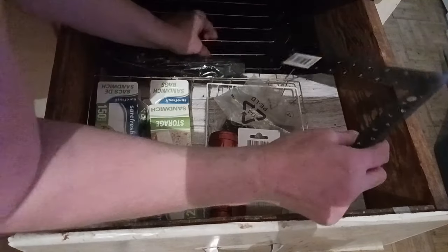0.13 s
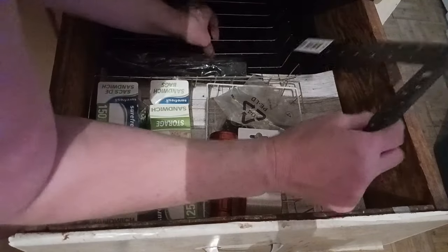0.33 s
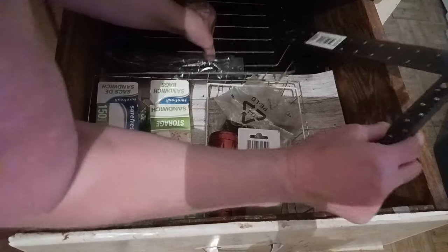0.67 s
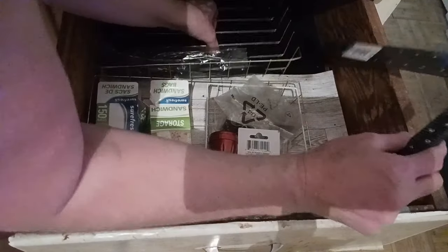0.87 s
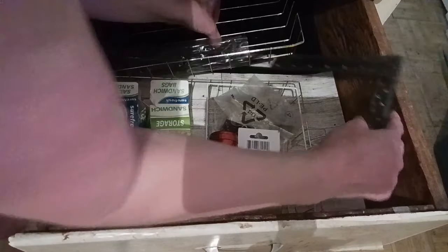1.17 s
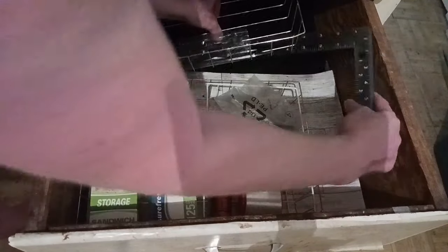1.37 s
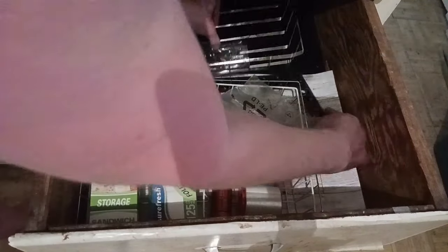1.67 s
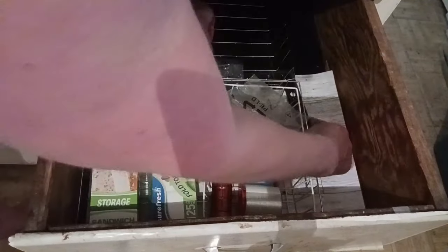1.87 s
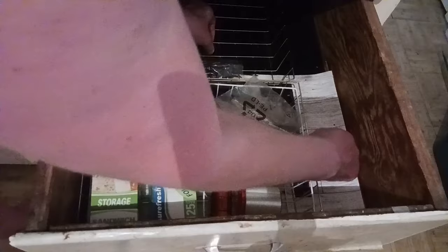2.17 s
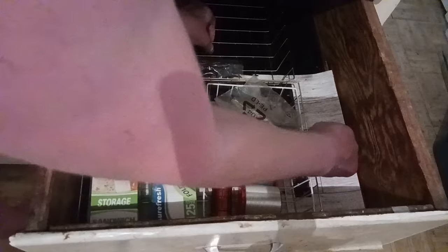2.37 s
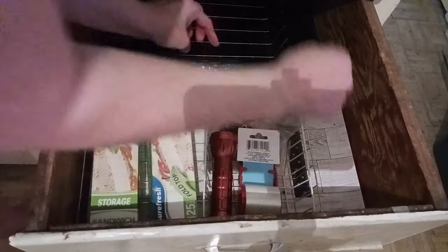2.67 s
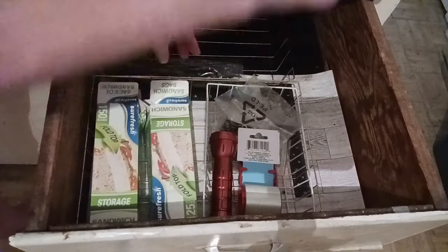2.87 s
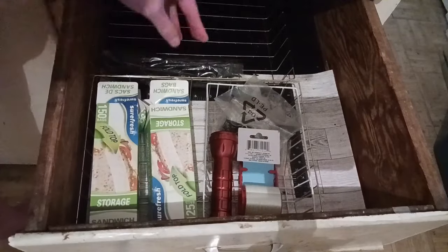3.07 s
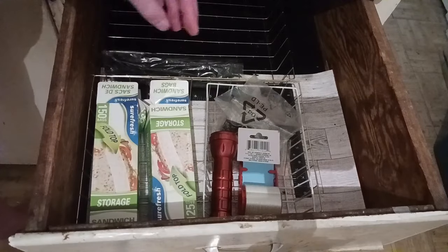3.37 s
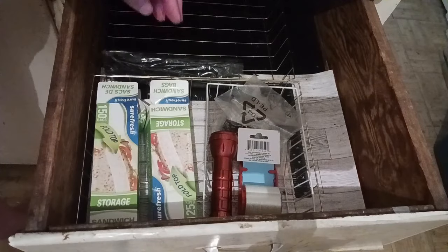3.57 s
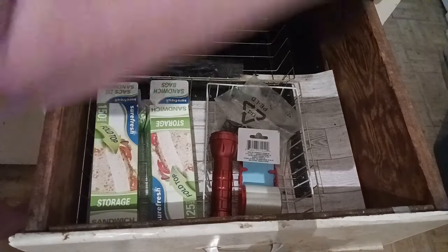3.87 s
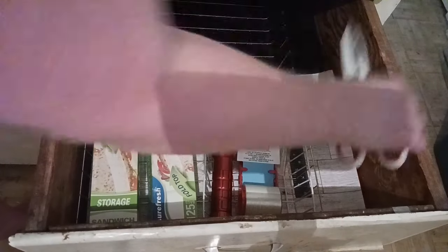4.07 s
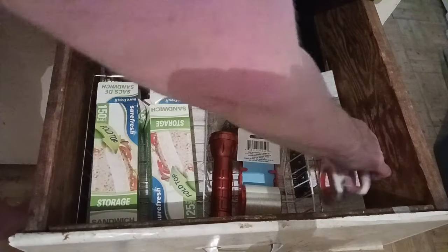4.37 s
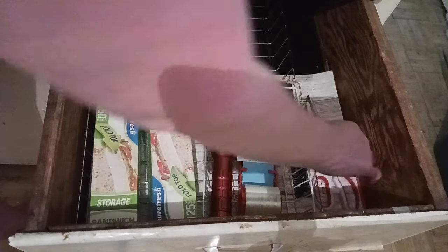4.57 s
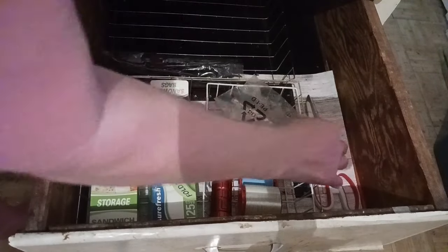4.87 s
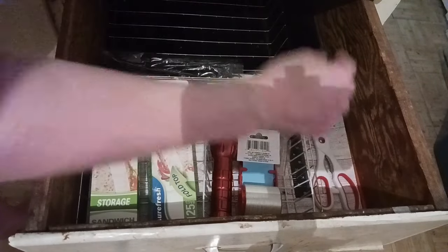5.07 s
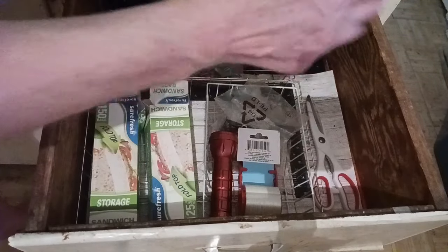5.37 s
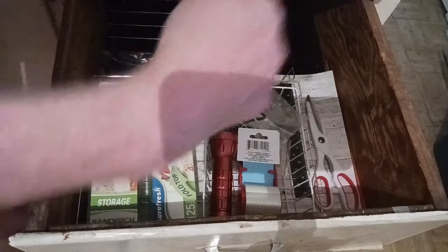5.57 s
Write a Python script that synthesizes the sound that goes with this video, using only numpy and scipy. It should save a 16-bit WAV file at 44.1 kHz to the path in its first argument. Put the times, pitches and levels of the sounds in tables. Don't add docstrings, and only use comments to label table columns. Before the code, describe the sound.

Close above an open wooden drawer in a quiet kitchen, a steel square scrapes and ticks on wire baskets, landing with rattles and hollow wooden knocks, loudest about a second and a half in. A near-silent gap with faint fridge hum follows, then a light plastic rustle, scissors clacking down onto paper, and dry crinkling to the end. Stereo microphone, very near, short boxy echoes.

```python
import sys
import numpy as np
from scipy import signal
from scipy.fft import rfft, irfft, next_fast_len
from scipy.io import wavfile

SR = 44100
rng = np.random.default_rng(int(sys.argv[2]) if len(sys.argv) > 2 else 0)


def dump(signal):
    limited = np.clip(np.atleast_2d(signal).T, -1, 1)
    pcm = np.round(limited * 32767).astype(np.int16)
    wavfile.write(sys.argv[1], SR, pcm)


def to_linear_factor(level_db):
    exponent = np.asarray(level_db, float) / 20
    return 10 ** exponent


N = 252252
SPAN = 1 << 14

# pitch_hz, level_db (per Hz)
AIR = [(15, -60), (25, -34), (41, -12), (64, -8), (91, -26), (108, -17), (169, -7), (220, -9), (242, -23),
       (282, -9.5), (324, -14), (455, -11), (680, -24.5), (1000, -30.5), (1300, -59), (2200, -120)]
# pitch_hz, likeness (-1 to 1)
AIR_ALIKE = [(60, 0.71), (180, 0.7), (550, 0.27), (1650, -0.22), (4970, 0.63), (15000, -0.21)]
# pitch_hz, level_db (per Hz)
HISS = [(530, -39), (900, -16), (978, -7.5), (1210, -13), (1450, -8.5), (1780, -13.5), (3000, -19.5),
        (5520, -27), (7530, -16), (8690, -21.5), (15600, -12.5)]
# pitch_hz, width_hz, level_db
FRIDGE = [
    (61, 5.1, -74.5),
    (2100, 15, -94),
    (7560, 330, -95.5),
]
# pitch_hz, t60_s
KITCHEN_T60 = [(100, 0.3), (500, 0.28), (2000, 0.31), (6000, 0.3), (14000, 0.25)]
# pitch_hz, likeness (-1 to 1)
ECHO_ALIKE = [(100, 0.8), (400, 0.8), (800, 0.22), (1500, 0.044), (14000, 0.039)]
# pitch_hz, level_db
ECHO_COLOUR = [(60, -4.5), (300, -2), (800, 3), (2000, 3), (12000, 4.5)]
# pitch_hz, left_minus_right_db
PORT_LEAN = [(60, -2.5), (180, -2.5), (550, -4.5), (1650, -0.5), (4970, -1.5), (15000, 3)]
# time_s, left_minus_right_db
PLACE = [(0.0, 2.5), (1.15, 2), (1.42, 1), (1.75, 2), (3.09, 7), (3.47, 3), (3.9, 3), (5.23, 4),
         (5.72, 16.5)]

# pitch_hz, width_hz, level_db
CARCASS = [(59.6, 4.6, -1), (122, 59, -7.5)]
# pitch_hz, width_hz, level_db
BOARDS = [(59, 9, -9.5), (114, 22, -9), (159, 35, -7.5), (270, 127.4, 1), (329, 52, -3), (367.4, 17, -5),
          (434.2, 55, 0.5), (474, 99, -4.5), (541.6, 34, -4.5)]
# pitch_hz, width_hz, level_db
KNOCK = [(744, 84, 2), (822, 88, 2.5), (869, 75, 1.5), (1100, 24, -3.5), (1190, 120, -5), (1530, 700, -4),
         (1695, 37, -13.5), (1860, 170, -15), (2360, 730, -3.5)]
# pitch_hz, level_db (per Hz)
BUZZ = [(530, -15), (950, -7.5), (1170, -5.5), (1630, -6.5), (3000, -7.5), (4000, -4.5), (5800, -11.5),
        (8590, -15.5), (10500, -13.5), (13200, -13.5), (15600, -21.5)]
# pitch_hz, level_db (per Hz)
RASP = [(290, -24), (500, -12), (1030, -17), (1400, -6), (1900, -9), (3250, -11), (3810, -10), (8050, -1),
        (12200, 7), (15600, 2)]
# pitch_hz, level_db (per Hz)
LINER = [(350, -1.5), (700, -3.5), (1300, 3), (2300, -3), (4400, -32), (9000, -30.5), (15600, -21)]

# start_s, level_db
SHAKES = [(0.0, -46), (0.22, -33.5), (0.52, -42), (0.64, -45), (1.04, -32.5), (1.17, -26), (1.573, -32.5),
          (1.683, -45.5), (1.865, -36.5), (2.15, -40), (3.459, -49), (4.29, -46), (4.419, -26.5),
          (4.47, -35), (4.533, -31.5), (4.6, -58.5)]
# start_s, length_s, pitch_hz, rise_hz, level_db
SQUEAK = (3.875, .11, 12900, 1600, -70)
# start_s, peak_db, body_db, left_minus_right_db
SNAPS = [(2.94, -60.5, -17.5, 9), (3.25, -54, -28, 10.5), (3.326, -58, -9, 5), (3.34, -59, -2, 4),
         (3.583, -27, -20, -0.5), (4.823, -48.5, 4, 2.5), (4.965, -53, 4, 4), (5.561, -56.5, 7.5, 5),
         (4.9037, -43, -7, 3), (4.93, -53, 4, -1), (5.146, -43, -6, 3), (5.01, -32.5, 1, 3),
         (5.0575, -31, -4.5, 2), (5.083, -35, 1, -1), (5.1812, -40.5, 2.5, 4.5), (5.299, -65, 2, 6),
         (5.3608, -64, 14, 7), (5.383, -57.5, 8, 10), (5.4558, -59, 3, 8), (5.4838, -42.5, 3.5, 5.5),
         (5.503, -61, 7, 1), (5.5524, -58.5, -1, 9.5), (5.597, -45, 2, 4.5), (5.6679, -47, -21, 5),
         (5.6827, -49.5, -14.5, 9.5)]
# start_s, length_s, rattle_db, boards_db
DRAGS = [(0.0, 0.11, -54.5, -42), (0.2, 0.19, -46.5, -35), (0.55, 0.26, -46, -38.5), (1.06, 0.34, -48, -30),
         (1.41, 0.2, -49, -33), (1.58, 0.082, -44, -45), (1.87, 0.15, -43.5, -65.5),
         (2.1, 0.186, -59.5, -45), (4.285, 0.16, -54, -38), (4.43, 0.11, -51, -32.5),
         (4.55, 0.1, -62, -53.5)]
# start_s, length_s, rasp_db, boards_db
RUSTLES = [(3.44, 0.31, -61, -59), (3.553, 0.11, -42.5, -61), (4.83, 0.44, -60.5, -61),
           (4.986, 0.16, -47, -61), (5.14, 0.23, -65.5, -70.5), (5.4, 0.34, -72, -69)]
# start_s, length_s, scrape_db, boards_db
SCRAPES = [(1.0, 0.057, -49, -43), (1.44, 0.15, -41, -38.5), (3.31, 0.13, -52.5, -54), (3.4, 0.1, -53, -48),
           (4.3, 0.11, -36.5, -55), (3.9, 0.18, -75.5, -62.5), (4.815, 0.084, -45.5, -57),
           (5.0, 0.16, -47, -85), (5.46, 0.15, -67.5, -76)]
# start_s, pitch_hz, level_db, t60_s
RINGS = [(.112, 3500, -26, 0.06), (0.205, 3200, -30, 0.15), (0.2, 4600, -32, 0.15), (.522, 3900, -33, 0.08),
         (.55, 3600, -44, .2), (.0, 3630, -56, .6), (.125, 4200, -34, .15), (0.6255, 915, -27, 0.3),
         (.63, 3634, -40, 0.3), (.63, 1530, -39, .15), (.66, 1400, -43, .2), (.72, 4215, -45, .3),
         (.745, 4570, -46, .15), (.43, 5300, -48, .5), (.712, 861, -42, 0.15), (.752, 915, -41, 0.22),
         (1.179, 3800, -27, 0.08), (1.19, 4450, -33, .1), (1.108, 3650, -39, .5), (1.04, 4300, -36, .25),
         (0.891, 910, -36, 0.2), (0.893, 2050, -41, 0.25), (.892, 3640, -46, 0.4), (.62, 1125, -46, .3),
         (1.034, 4030, -25, 0.023), (1.107, 4550, -46, 0.48), (1.428, 2350, -37, .12),
         (1.424, 2090, -40, .1), (1.461, 2350, -37, .07), (1.575, 2500, -35.5, 0.17),
         (1.684, 1800, -24.5, 0.044), (1.684, 900, -24, 0.04), (1.75, 5110, -38, 0.21),
         (4.324, 770, -24.5, 0.025), (4.421, 1470, -14.5, 0.021), (4.537, 2390, -17, 0.03),
         (4.585, 2300, -37, 0.15), (4.55, 2600, -35, .15), (4.33, 1400, -41.5, 0.16),
         (4.47, 1500, -45, 0.18), (.76, 1720, -56, .5)]
# start_s, pitch_hz, level_db, t60_s
RAPS = [(.6245, 870, -22.5, 0.035), (.655, 311, -32.5, 0.13), (.634, 700, -35.5, 0.057),
        (0.626, 1440, -45, 0.062), (0.89, 1930, -30.5, 0.027), (1.572, 1100, -20, 0.023),
        (1.5785, 525, -18, 0.062), (1.6842, 1500, 0, .004), (1.6846, 518, -12.5, 0.035),
        (1.686, 389, -18, 0.15), (1.722, 510, -19.5, 0.095), (1.888, 532, -25, 0.076),
        (3.339, 1260, -45, 0.027), (1.168, 294, -26.5, 0.072), (1.167, 1970, -29, 0.027),
        (1.217, 270, -23, .08), (1.272, 265, -29, .1), (1.325, 330, -32, .15), (1.461, 400, -25, 0.07),
        (1.461, 1100, -37, .06), (1.492, 410, -25, 0.07), (1.534, 380, -25, .07), (4.824, 1450, -49, .08),
        (5.455, 1300, -56, .03), (5.485, 1350, -52, .03), (5.504, 1300, -53, .03), (5.552, 1300, -59, .03),
        (5.384, 1300, -56, .02), (1.13, 1500, -34, .02), (1.575, 3050, -24.5, 0.033),
        (1.535, 696, -29.5, 0.035), (1.534, 1100, -33, 0.025), (4.325, 260, -22.5, 0.12),
        (.892, 403, -32.5, 0.18), (1.686, 1172, -15, 0.064), (1.728, 1190, -17.5, .02),
        (1.8623, 2460, -17.5, 0.0011), (2.155, 277.3, -30, 0.17), (2.135, 270, -40, 0.34),
        (4.324, 511, -21, 0.07), (4.323, 1506, -26.5, 0.041), (4.396, 530, -25.5, 0.027),
        (4.396, 790, -36.5, 0.037), (4.419, 2106, -16, 0.027), (4.535, 1245, -20.5, 0.019),
        (4.54, 3160, -24.5, 0.028), (4.54, 279, -20.5, 0.06)]

# start_s, peak_db, boards_over_peak_db, brightness_db
BRUSHES = [(0.032, -36.5, -13, 2), (0.1118, -13.5, -16, 2), (0.2927, -28, -8.5, -4), (0.3915, -20, -17, 8),
           (0.877, -40, -21, 6), (0.8901, -27.5, -2, -19), (1.141, -29.5, -3, -3), (1.19, -22, -7, -3.5),
           (1.8665, -13, -15, 1), (1.1782, -13.5, -11, -2.5), (1.424, -35.5, -9, -5),
           (2.0726, -41.5, -5.5, -8), (3.4146, -49, -29, -7), (3.5538, -36, -24, -0.5),
           (4.5262, -22.5, -16, -5), (4.897, -42, -20, -13.5), (4.9856, -40, -35, -5)]
RATTLES = [(0.1864, -14.5, -12.5, 1), (0.2053, -20, -11.5, 0.5), (0.5207, -21, -13.5, -1),
           (0.7195, -40.5, 0, -6), (1.036, -20.5, -3, -3), (1.1052, -27.5, -19, -5.5),
           (1.1672, -18, -4.5, -0.5), (1.7265, -21.5, 3, -8.5), (4.2898, -31, 4, -3)]
BLOWS = [(0.4183, -26.5, -3.5, -5), (0.5791, -37, 4, -15), (1.2708, -26, -4, -6.5),
         (1.4324, -26.5, -15.5, 0.5), (1.4603, -36.5, -3.5, -14.5), (1.573, -16.5, -3, -8.5),
         (1.5785, -6, -9.5, -6.5), (1.6842, -6, -10, -11), (1.8636, -14.5, -10, -8),
         (1.889, -27, -1.5, 0.5), (2.1544, -23, -4, -7.5)]
TAPS = [(0.631, -29.5, -32, -2), (1.2335, -32.5, -13, 0.5), (1.6174, -34, -22, -24), (3.322, -66, 4, -1),
        (4.469, -38.5, -7, -8)]
THUDS = [(0.1318, -26.5, 6.3, -36), (0.6225, -48.5, 18.7, -20), (1.4948, -39, 8.1, -38.5),
         (1.535, -41.5, 6, -13), (2.1266, -69, 23, 5), (3.3393, -50.5, 5.1, -15), (4.3232, -33, 9.7, -6.5),
         (4.3996, -45, 7.7, -9), (4.5415, -37.5, 14.9, -34)]
SCISSORS = [(4.3232, -28.5, 2, -18.5), (4.419, -9, -2.5, 1.5), (4.5355, -14.5, -10, -16),
            (4.5405, -18.5, -5.5, -24)]
TICKS = [(0.0, -43, -6.5, -5.5), (.7, -32.5, -16, -3), (1.13, -29, -6.5, -4), (1.416, -49, -14, -12.5),
         (2.163, -30, -14, -3), (4.429, -22.5, -21.5, -15), (.5627, -28, -8, 14), (.798, -43.5, -20, -2),
         (.878, -53, -20, 1)]
# rows, knock_over_peak_db, chatter_t60_s, first_crack_over_chatter (ratio),
# drawer_echo_db, kitchen_echo_db, top_octave_db
CONTACTS = [(BRUSHES, -27.5, 0.038, 1.6, 4.2, 6.7, 0.45), (RATTLES, -15, 0.055, 1.1, 3.1, 4, 0.5),
            (BLOWS, -7, 0.046, 4, 0.74, 3, 0.5), (TAPS, -1, .08, 2, 15, 4, 0.5),
            (THUDS, -0.5, 0.087, 1.3, 3, 3.7, -1), (SCISSORS, -7, 0.017, 7.3, 2.4, 0.69, -8.5),
            (TICKS, -11.5, 0.05, 1.6, 4.7, 2.2, 0.5)]


def unit(x):
    return x / np.sqrt(np.mean(x ** 2) + 1e-20)


def peak(x):
    return x / (np.abs(x).max() + 1e-12)


def along(points, hz):
    f, v = np.transpose(points)
    return np.interp(np.log(hz + 1), np.log(f + 1), v)


def hand_place():
    s, pan_db = np.transpose(PLACE)
    return np.interp(np.arange(N) / SR, s, pan_db)


def filtered(x, response):
    m = next_fast_len(x.shape[-1] + 4096)
    spectrum = rfft(x, m) * response(np.fft.rfftfreq(m, 1 / SR))
    return irfft(spectrum, m)[..., :x.shape[-1]]


def tilted(spectrum, bright_db):
    def response(hz):
        above_4k = np.clip(np.log2(hz / 4000 + 1e-3), 0, 1)
        above_8k = np.clip(np.log2(hz / 8000 + 1e-3), 0, 1)
        return to_linear_factor(along(spectrum, hz) + bright_db * above_4k + 0.37 * bright_db * above_8k)
    return response


def modes(table, scatter_db):
    hz, width, db = np.transpose(table)[..., None]
    signs = (-1) ** np.arange(len(table))
    gains = to_linear_factor(db[:, 0] + scatter_db * rng.standard_normal(len(table))) * signs
    return lambda f: gains @ (1 / (1 - 1j * (hz * hz / (f + 1e-6) - f) / width))


def mesh(share):
    wire_hz = 1100 * (7000 / 1100) ** rng.random(40)
    thicket = modes([(hz, 22 + .008 * hz, 0) for hz in wire_hz], scatter_db=2)
    grid = np.geomspace(100, SR / 2, 2500)
    return lambda f: 1 + share * np.interp(f, grid, thicket(grid))


def grainy(size, spread_db, grain):
    luck = np.minimum(rng.exponential(size=size // grain + 1), 3)
    strength = np.repeat(to_linear_factor(spread_db * luck), grain)[:size]
    return unit(strength * rng.standard_normal(size))


def stroke(length_s):
    attack_s, release_s, fade_db = 0.046, 0.056, 10
    t = np.arange(round(length_s * SR)) / SR
    rise = np.minimum(t / attack_s, 1)
    fall = np.minimum((length_s - t) / release_s, 1)
    return rise * to_linear_factor(-fade_db * t / length_s) * fall


def paired(x, alike):
    def turn(hz):
        return np.arccos(np.clip(along(alike, hz), -1, 1)) / 2
    mid, side = filtered(x, lambda hz: np.array([np.cos(turn(hz)), np.sin(turn(hz))]))
    return np.array([mid + side, mid - side])


def add(track, sound, s):
    part = track[:, round(s * SR):][:, :sound.shape[1]]
    part += sound[:, :part.shape[1]]


def kitchen():
    def noise(response):
        return unit(filtered(rng.standard_normal((2, N)), response))
    air = to_linear_factor(-66) * noise(lambda hz: to_linear_factor(along(AIR, hz)))
    hiss = to_linear_factor(-73) * noise(lambda hz: to_linear_factor(along(HISS, hz)))
    hum = sum(to_linear_factor(db) * noise(lambda f: np.exp(-((f - hz) / width) ** 2)) for hz, width, db in FRIDGE)
    motor = to_linear_factor(-68.5) * np.sin(2 * np.pi * 59.5 * np.arange(N) / SR)
    return paired(air + hiss + hum, AIR_ALIKE) + motor


def echoes(count):
    t = np.arange(SPAN) / SR
    hz, ts, z = signal.stft(rng.standard_normal((count, 2, SPAN)), SR, nperseg=256)
    decay = to_linear_factor(-60 * ts / along(KITCHEN_T60, hz)[:, None])
    tail = signal.istft(z * decay, SR, nperseg=256)[1][..., :SPAN]
    tail = tail * (1 - to_linear_factor(-60 * t / 0.023))
    box = rng.standard_normal((count, 2, SPAN)) * to_linear_factor(-60 * t / 0.032)

    def ports(echo):
        coloured = filtered(unit(echo), lambda hz: to_linear_factor(along(ECHO_COLOUR, hz)))
        return paired(coloured, ECHO_ALIKE) / np.sqrt(SPAN)
    return [ports(e) for e in box], [ports(e) for e in tail]


def heard(x, space, pan_db, box_db, room_db):
    box, tail = (stock[rng.integers(len(stock))] for stock in space)
    echo = to_linear_factor(box_db) * box + to_linear_factor(room_db) * tail
    wet = signal.fftconvolve(x[None], echo, axes=1)[:, :len(x)]
    return (x + wet) * to_linear_factor(np.array([[pan_db], [-pan_db]]) / 2)


def cabinet():
    rise_s, t60_s = 0.018, 0.3
    loads, t = np.zeros(N), np.arange(SR) / SR
    for s, db in SHAKES:
        loads[round(s * SR)] = to_linear_factor(db)
    swing = signal.fftconvolve(loads, to_linear_factor(-60 * t / t60_s) * (1 - np.exp(-t / rise_s)))[:N]
    body = modes(CARCASS, scatter_db=0)
    rumble = filtered(rng.standard_normal(N), lambda hz: body(hz) * (hz < 200) * (hz > 42))
    return swing * unit(rumble)


def squeak():
    s, length_s, hz, rise_hz, db = SQUEAK
    arch = np.sin(np.pi * np.clip((np.arange(N) / SR - s) / length_s, 0, 1))
    rough = np.cumsum(rng.standard_normal(N)) * .04
    return to_linear_factor(db) * arch * np.sin(2 * np.pi * np.cumsum(hz + rise_hz * arch) / SR + rough)


def snaps(space):
    out, t = np.zeros((2, N)), np.arange(SPAN // 2) / SR
    for s, db, body_db, pan_db in SNAPS:
        click = rng.standard_normal(len(t)) * to_linear_factor(-60 * t / .007)
        shape = modes([(1350, 400, 0), (2000, 800, -4), (3500, 2000, -4)], scatter_db=2)
        body = peak(filtered(click, lambda hz: shape(hz) * (hz / 1100) ** 3 / (1 + (hz / 1100) ** 3)))
        crisp = peak(filtered(click, lambda hz: hz > 5000))
        sound = to_linear_factor(db - 1.0) * (crisp + to_linear_factor(body_db) * body)
        add(out, heard(sound, space, pan_db, box_db=-3, room_db=-4.5), s)
    return out


def basket_rattle():
    def layer(bright_db):
        chatter = filtered(grainy(N, spread_db=6, grain=24), tilted(BUZZ, bright_db))
        return unit(filtered(chatter, mesh(.22)))
    return layer(-20) + to_linear_factor(2.5) * layer(6)


def film_rasp():
    def layer(bright_db):
        return unit(filtered(grainy(N, spread_db=3, grain=16), tilted(RASP, bright_db)))
    return layer(-20) + to_linear_factor(-7.5) * layer(0)


def rubbing(space):
    out = np.zeros((2, N))
    grumble = unit(filtered(grainy(N, spread_db=3, grain=120), modes(BOARDS[3:], scatter_db=0)))
    scrape = unit(filtered(grainy(N, spread_db=-1.5, grain=40), lambda hz: to_linear_factor(along(LINER, hz))))
    for rows, texture in ((DRAGS, basket_rattle()), (RUSTLES, film_rasp()), (SCRAPES, scrape)):
        for s, length_s, db, boards_db in rows:
            shape = stroke(length_s)
            span = slice(round(s * SR), round(s * SR) + len(shape))
            sound = to_linear_factor(db - 9.5) * texture[span] + to_linear_factor(boards_db - 7.0) * grumble[span]
            sound = np.pad(sound * shape[:len(sound)], (0, SPAN))
            add(out, heard(sound, space, 0, box_db=5.5, room_db=1.5), s)
    return out * to_linear_factor(hand_place() * [[.5], [-.5]])


def wires(space):
    out, t = np.zeros((2, N)), np.arange(SPAN) / SR
    for s, hz, db, t60 in RINGS + RAPS:
        drift = np.cumsum(rng.standard_normal(SPAN)) * .006
        ring = np.sin(2 * np.pi * hz * t + drift)
        ring += .35 * np.sin(2 * np.pi * hz * 1.012 * t - drift)
        onset = 1 - np.exp(-t / 0.00033)
        fade = to_linear_factor(db - 60 * t / min(t60, .9)) * np.cos(np.pi / 2 * t / t[-1]) * onset
        add(out, heard(ring * fade, space, 1.5, box_db=-13, room_db=-12), s)
    return out


def contact(boards_db, bright_db, knock_db, t60, hard, top_db):
    t = np.arange(SPAN) / SR
    chatter = grainy(SPAN, spread_db=2, grain=24) * to_linear_factor(-60 * t / max(t60, .004))
    blow = np.exp(-t / 0.00026) * 3 + chatter * 0.21 * to_linear_factor(-60 * t / 0.13)
    crack = chatter * (1 + hard * to_linear_factor(-60 * t / 0.015))
    colour, baskets = tilted(BUZZ, bright_db + 4), mesh(.05)

    def wire(hz):
        return colour(hz) * baskets(hz) * to_linear_factor(top_db * np.clip(hz / 4000 - 2, 0, 1))
    buzz = peak(filtered(crack, wire))
    thump = peak(filtered(blow, modes(BOARDS[1:], scatter_db=3)))
    knock = peak(filtered(blow, modes(KNOCK, scatter_db=4)))
    return buzz + to_linear_factor(boards_db + 1.5) * thump + to_linear_factor(knock_db - 1.5) * knock


def hits(space):
    out, place = np.zeros((2, N)), hand_place()
    for rows, knock_db, t60, hard, box_db, room_db, top_db in CONTACTS:
        for s, db, boards_db, bright_db in rows:
            sound = to_linear_factor(db - 3.0) * contact(boards_db, bright_db, knock_db, t60, hard, top_db)
            add(out, heard(sound, space, place[round(s * SR)], box_db, room_db), s)
    return out


def scene():
    lead_s = 4 / SR
    space = echoes(count=20)
    near = cabinet() + squeak() + snaps(space) + rubbing(space) + wires(space) + hits(space)

    def ports(hz):
        lean = to_linear_factor(along(PORT_LEAN, hz) * [[.5], [-.5]])
        return lean * np.exp(-2j * np.pi * hz * [[0], [lead_s]])
    return kitchen() + filtered(near, ports)


def roll_off(x):
    return signal.sosfilt(signal.butter(12, 16640, fs=SR, output="sos"), x)


def record(dry):
    band = [(20, -16), (45, 0), (15300, 0), (15800, -23), (16600, -25), (16700, -120)]  # (Hz, dB)
    x = filtered(dry, lambda hz: to_linear_factor(along(band, hz)))
    x = x / (1 + np.abs(x / 1.1) ** 4) ** (1 / 4)
    return roll_off(x)


dry = scene()
out = record(dry)
dump(out)
```